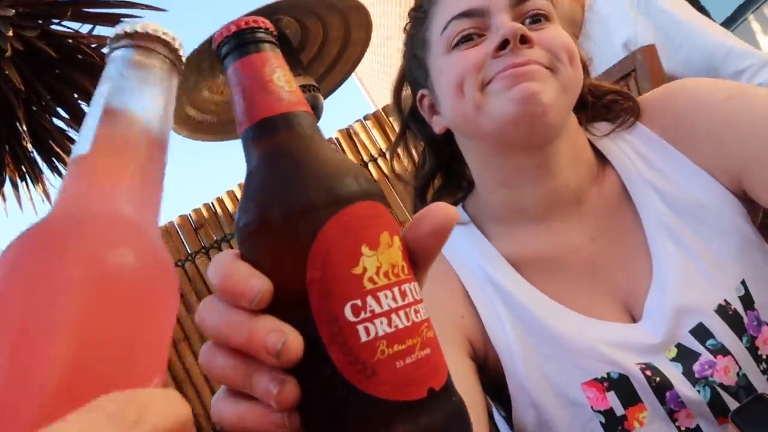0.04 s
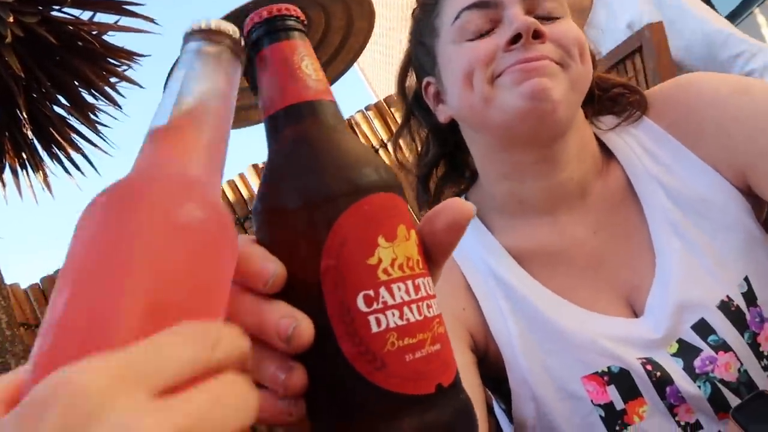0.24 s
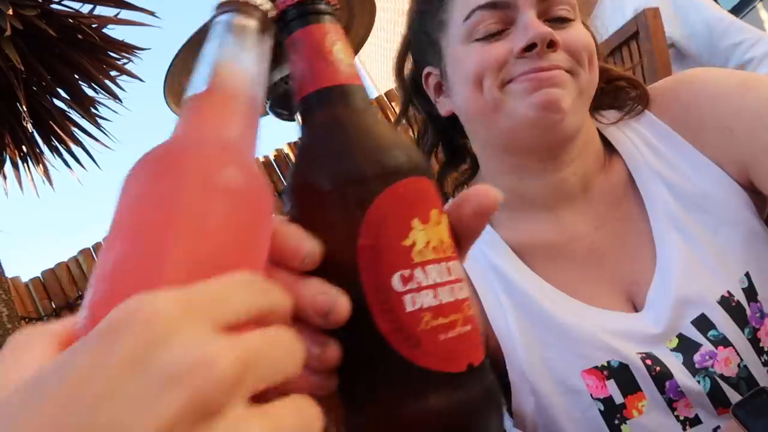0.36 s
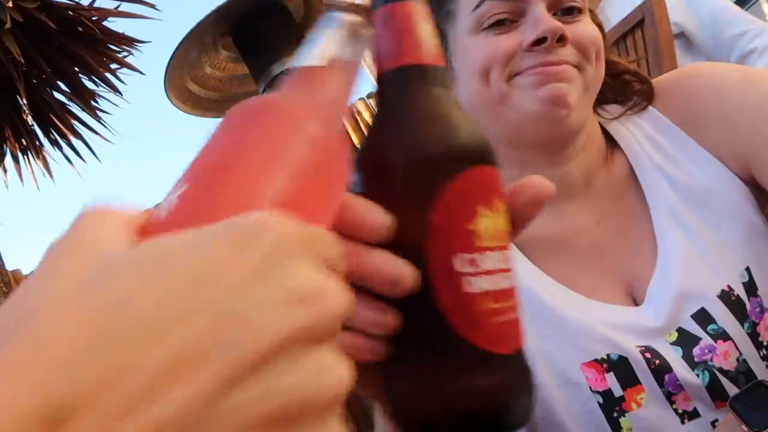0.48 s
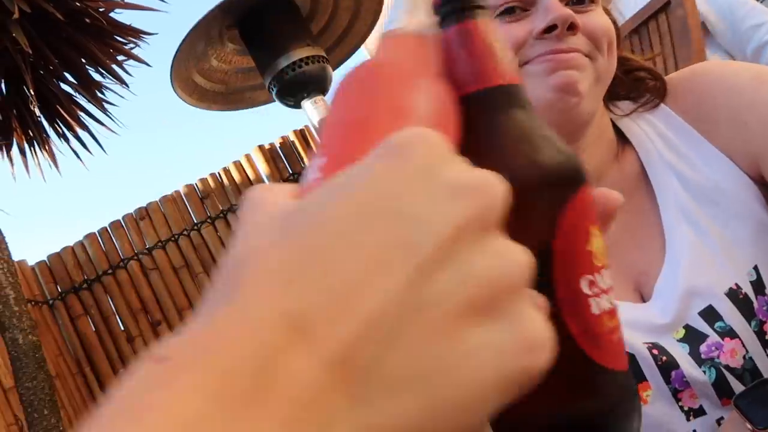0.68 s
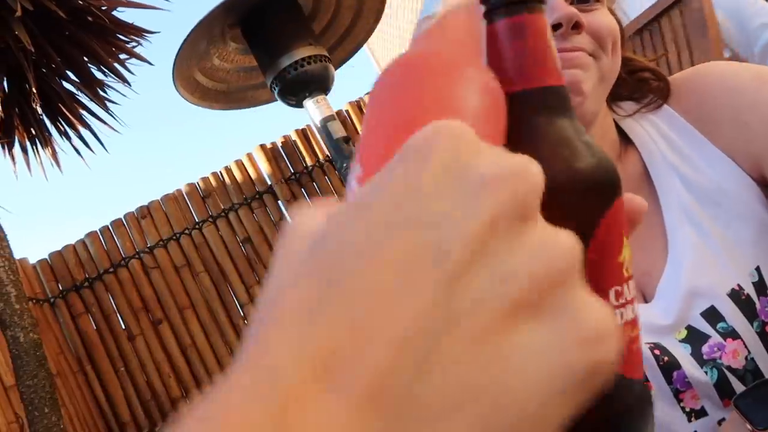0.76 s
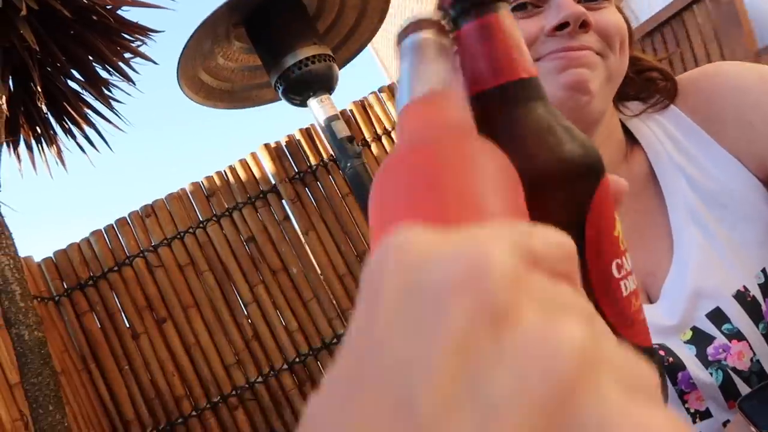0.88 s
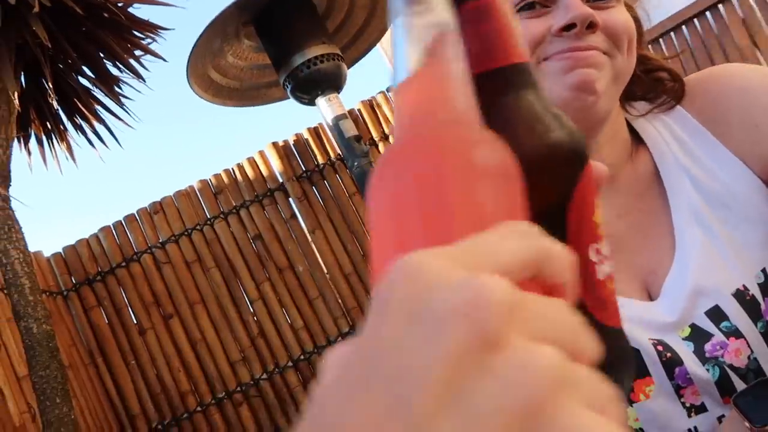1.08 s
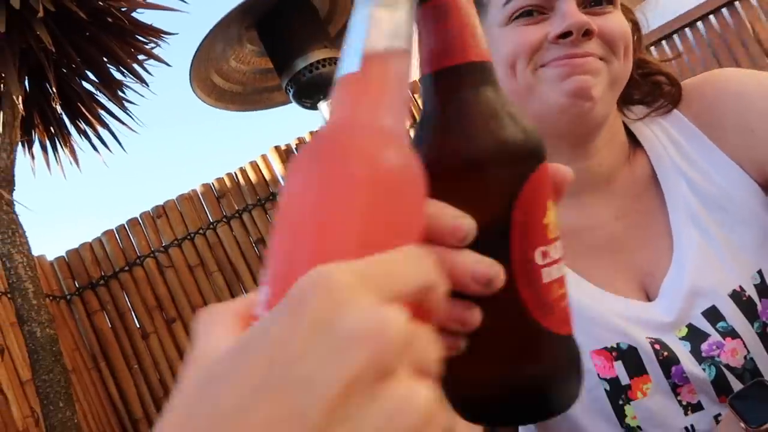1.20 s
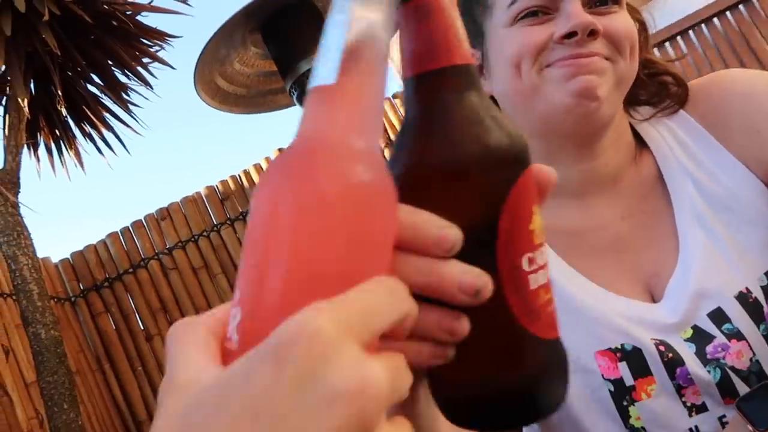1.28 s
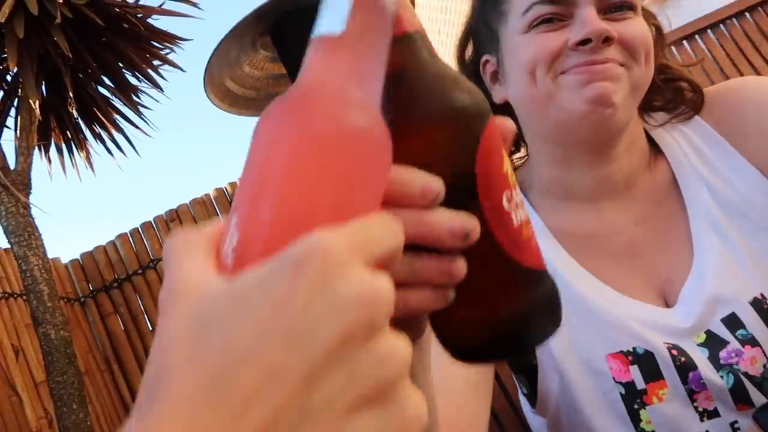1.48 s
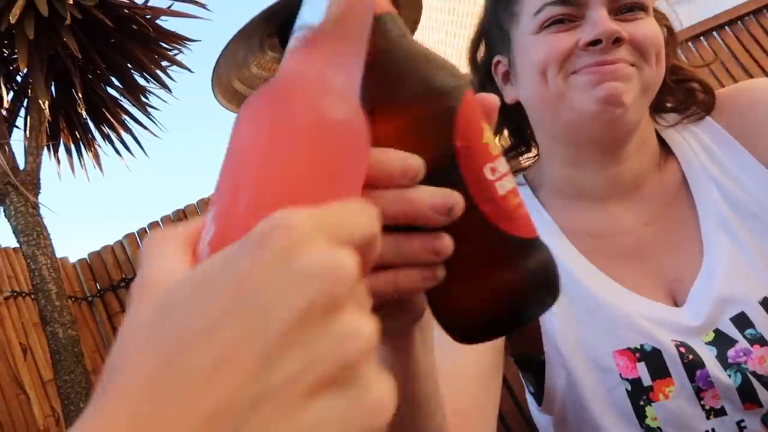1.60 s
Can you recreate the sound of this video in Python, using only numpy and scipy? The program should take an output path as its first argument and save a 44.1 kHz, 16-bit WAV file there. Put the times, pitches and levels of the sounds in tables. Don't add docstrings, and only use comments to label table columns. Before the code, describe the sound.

Two full glass bottles clink close to a small camera microphone outdoors. A faint ring dies away, then hard bright knocks hit at 0.22-0.32 s. A dense run from 0.49 s chatters and scrapes around 0.65-0.88 s, with sharp last clinks near 0.95 s. High, beating rings fade after 1 s; a faint rub at 1.4 s and light taps at 1.5-1.65 s follow over low rumble and hum.

```python
import sys
import numpy as np
from scipy import signal
from scipy.fft import rfft, irfft, next_fast_len
from scipy.io import wavfile

SR = 44100
rng = np.random.default_rng(int(sys.argv[2]) if len(sys.argv) > 2 else 0)


def put_to_file(sound):
    columns = np.atleast_2d(sound).T
    safe = np.clip(columns, -1, 1)
    whole_steps = np.round(safe * 32767)
    wavfile.write(sys.argv[1], SR, whole_steps.astype(np.int16))


def amplitude_ratio(level_db):
    exponent = np.asarray(level_db, float) / 20
    return 10 ** exponent


N = 72765
TIME_S = np.arange(N) / SR


def rms_one(x):
    return x / np.sqrt(np.mean(x ** 2) + 1e-20)


def at_hz(points, hz):
    table_hz, value = np.array(points).T
    return np.interp(np.log(hz), np.log(table_hz), value)


def over_time(points):
    return np.interp(TIME_S, *np.transpose(points))


def latest(start_s):
    return np.searchsorted(start_s, TIME_S, "right") - 1


def resonance(x, hz, width_hz):
    r = np.exp(-np.pi * width_hz / SR)
    b = (1 - r * r) / 2
    return signal.lfilter([b, 0, -b], [1, -2 * r * np.cos(2 * np.pi * hz / SR), r * r], x + 1e-18)


def double_resonance(x, hz, width_hz):
    return resonance(resonance(x, hz, width_hz), hz, width_hz)


def struck(start_s, level_db, hz, t60_s, share=0, split_hz=0):
    contact_s = 0.00028
    k = latest(start_s)
    age_s = TIME_S - start_s[k]
    share = (share * np.ones(len(start_s)))[k]
    decay = (k >= 0) * amplitude_ratio(level_db[k] + 2 - 60 * np.abs(age_s) / t60_s)
    swing = decay * (1 + share * np.exp(2j * np.pi * split_hz * age_s))
    r = np.exp(-1 / (contact_s * SR))
    swing = signal.lfilter([(1 - r) ** 2], [1, -2 * r, r * r], swing)
    return np.imag(swing * np.exp(2j * np.pi * np.cumsum(hz * np.ones(N)) / SR))


# (time [s], crack [dB], main ring [dB], second ring [dB])
SQUARE_KNOCKS = [
    (0.4898, -27, -38, -31.5),
    (0.5814, -11, -18, -22),
    (0.727, -4, -30.5, -29),
    (0.755, -11.5, -16.5, -38),
    (1.201, -33.5, -49, -57),
    (1.636, -17, -30, -40),
]
# (time [s], crack [dB], main ring [dB], second ring [dB])
PRESSED_KNOCKS = [(0.5408, -20.5, -23.5, -25.5), (0.5629, -5, -7.5, -28), (0.642, -16.5, -15.5, -30),
                  (0.6537, -18, -12.5, -28), (0.6619, -17.5, -24, -27), (0.6766, -23, -12, -41.5),
                  (0.7719, -12, -12.5, -30), (0.7824, -11.5, -11, -24.5), (1.0318, -45, -21.5, -38)]
# (time [s], crack [dB], main ring [dB], second ring [dB],
# partner share [ratio])
OWN_SHARE_KNOCKS = [(0.0, -76, -30, -48.5, -0.13), (0.2832, -9, -18, -21, -0.62),
                    (0.3161, -10, -16, -22, -0.37), (0.5135, -19, -20, -35.5, -.9),
                    (0.8154, -19.5, -14, -27.5, .25), (0.964, -57, -11, -32, .35),
                    (.990, -63, -9, -40, 0.56), (1.006, -65, -15, -42.5, -.15),
                    (0.5484, -13.5, -10, -21.5, -.4), (0.699, -33.5, -14, -29.5, -0.18),
                    (.706, -39, -20, -22.5, 0.002), (0.9137, -18, -13, -15, -0.26),
                    (1.1066, -49, -50, -57, -0.26), (.2240, -6, -6.5, -23, -0.41),
                    (0.2318, -40.5, -8.5, -41, 0.17), (.5728, -1.5, -6, -30, -0.84),
                    (0.9528, -7, -5.5, -28.5, 0.63), (1.212, -55, -61.5, -71, -0.39),
                    (0.974, -21.5, -5, -23.5, -0.1), (1.509, -36.5, -57, -50.5, -0.87),
                    (1.5199, -23, -37, -33, 0.54), (1.5413, -31.5, -41.5, -37, -1)]
# (time [s], pitch [Hz])
MAIN_SLOSH = [(0.222, 3278), (0.301, 3231), (0.362, 3269), (.52, 3322), (.65, 3202), (0.701, 3226),
              (.79, 3267), (0.888, 3266), (0.921, 3226), (0.991, 3262)]
# (time [s], pitch [Hz])
SECOND_RING_SLOSH = [(0.232, 4386), (0.381, 4346), (.49, 4410), (0.569, 4333), (.72, 4338), (0.852, 4387),
                     (.91, 4332), (1.089, 4337)]
# (time [s], level [dB])
NECK_KNOCKS = [
    (.590, -26),
    (.956, -31),
]


def walls():
    square_share, pressed_share = 0.27, 0.011
    rows = [(*r, square_share) for r in SQUARE_KNOCKS]
    rows += [(*r, pressed_share) for r in PRESSED_KNOCKS]
    rows += list(OWN_SHARE_KNOCKS)
    start_s, _, main_db, second_db, share = np.transpose(sorted(rows))
    main = struck(start_s, main_db, over_time(MAIN_SLOSH), t60_s=0.21, share=share, split_hz=35)
    second = struck(start_s, second_db, over_time(SECOND_RING_SLOSH), t60_s=0.13, share=0.29, split_hz=33)
    neck = struck(*np.transpose(NECK_KNOCKS), hz=3660, t60_s=0.13)
    return main + second + neck


# (time [s], crack [dB])
BOUNCES = [(0.5044, -28), (0.5894, -16.5), (0.7474, -9), (0.7664, -9), (0.7964, -13), (0.8034, -14),
           (0.9834, -21.5), (0.9914, -28.5), (1.4845, -36), (1.5264, -32), (.4965, -32), (.5095, -27),
           (.5738, -5.5), (.8095, -18), (.7605, -18), (1.6454, -23.5)]
# (centre [Hz], width [Hz], level [dB])
CONTACT_COLOUR = [(2000, 1360, 4), (1166, 280, -8)]
# (centre [Hz], width [Hz], level [dB])
GLINT_MODES = [(4656, 2000, -19.5), (6200, 1000, -17.5), (10040, 1400, -24.5), (12600, 970, -23.5)]


def buzz():
    k = np.arange(7)
    start_s, gap_s, shrink = 0.670, 0.0075, 0.955
    return list(zip(start_s + np.cumsum(gap_s * shrink ** k) - gap_s, -16 - 1.5 * k))


def cracks():
    highs_per_crack_db = 0.5
    knocks = list(SQUARE_KNOCKS) + list(PRESSED_KNOCKS) + list(OWN_SHARE_KNOCKS) + list(BOUNCES) + buzz()
    rows = np.array([r[:2] for r in knocks])
    clicks = np.zeros(N)
    clicks[(rows[:, 0] * SR).astype(int)] = amplitude_ratio(rows[:, 1] + 17)
    contact = clicks
    for level_db, t60_s in ((-23, 0.009), (-30.5, 0.061)):
        tail = signal.lfilter([1], [1, -amplitude_ratio(-60 / (t60_s * SR))], clicks + 1e-18)
        contact = contact + amplitude_ratio(level_db) * tail * rng.standard_normal(N)
    body = sum(amplitude_ratio(db) * (-1) ** k * resonance(contact, hz, width_hz)
               for k, (hz, width_hz, db) in enumerate(CONTACT_COLOUR))
    start_s, crack_db = rows[np.argsort(rows[:, 0])].T
    latest_db = crack_db[np.searchsorted(start_s, np.arange(1, N + 1) / SR) - 1]
    bright = contact * amplitude_ratio(highs_per_crack_db * (latest_db + 4))
    top = sum(amplitude_ratio(db) * double_resonance(bright, hz, width_hz) for hz, width_hz, db in GLINT_MODES)
    return signal.lfilter(*signal.butter(2, 4800, fs=SR), body) + top


# (time [s], low [dB], middle [dB], high [dB], top modes [dB])
SHOULDER_KNOCKS = [(0.2257, -36.5, -29, -50, -50), (0.2824, -23.5, -45.5, -38.5, -34.5),
                   (0.3164, -25.5, -54, -39.5, -41.5), (.490, -35.5, -46, -51.5, -60),
                   (0.5713, -19.5, -39.5, -50, -37.5), (0.6428, -30, -38, -46.5, -45),
                   (0.6767, -42, -47.5, -46.5, -45), (0.728, -14, -18.5, -48.5, -40),
                   (0.7476, -13, -23.5, -37, -44), (0.755, -11.5, -25.5, -31, -29.5),
                   (0.7726, -15.5, -30.5, -30.5, -29.5), (0.7829, -25.5, -33.5, -32, -32),
                   (0.7966, -21, -22.5, -29, -33), (0.817, -17.5, -37.5, -37.5, -40),
                   (0.913, -36.5, -35.5, -46.5, -38.5), (0.953, -42, -29, -47.5, -36.5),
                   (1.0324, -46.5, -54, -64, -69), (1.52, -51, -54.5, -58, -67)]
# (pitch [Hz], level [dB], t60 [s])
LOW_MODES = [(1850, -6, .09), (2360, -9, .05)]
MIDDLE_MODES = [(3705, 2, 0.12), (4590, -7.5, 0.077), (4710, -10.5, 0.15)]
HIGH_MODES = [(5830, -9, 0.066), (6520, -7.5, 0.058), (6810, -3.5, 0.088), (7010, -3.5, 0.14),
              (7650, -21, 0.035)]
TOP_MODES = [(8950, -20.5, 0.05), (9890, -11.5, .03), (10200, -12.5, .04), (11900, -11.5, 0.038),
             (12250, -13.5, 0.03), (12700, -8, .03), (13500, -15, .04), (15450, -25.5, .03)]
# (time [s], pitch [Hz], level [dB], t60 [s])
SINGLE_KNOCK_MODES = [(0.2844, 5020, -30, .11), (0.2818, 5819, -38, .2), (.3162, 5060, -46, .08),
                      (0.5709, 5830, -38, 0.088), (.524, 4354, -25, 0.097), (.2835, 8840, -41, .07),
                      (.3162, 8950, -48, .06), (0.726, 2323, -17.5, .07), (0.728, 5830, -32.5, .08),
                      (.772, 4720, -30, .1), (0.8159, 4730, -29, 0.18), (0.8155, 2513, -31, .07),
                      (0.953, 9610, -25.5, .022), (.952, 10900, -35, .03), (.952, 15370, -44, .04),
                      (.952, 8200, -43, 0.035), (0.95, 5886, -33, 0.07), (1.031, 6900, -54, .08),
                      (1.455, 4350, -54, .08), (1.485, 4290, -51.5, .08)]


def shoulders():
    scatter_db, pitch_scatter = 4.5, 0.006
    partner_share, partner_split = 0.15, 0.018
    start_s, *levels_db = np.transpose(SHOULDER_KNOCKS)
    count, k = len(start_s), latest(start_s)
    out = np.zeros(N)
    for group_db, modes in zip(levels_db, (LOW_MODES, MIDDLE_MODES, HIGH_MODES, TOP_MODES)):
        for hz, mode_db, t60_s in modes:
            knock_db = group_db + mode_db + scatter_db * rng.standard_normal(count)
            knock_hz = hz * (1 + pitch_scatter * (hz > 4000) * rng.standard_normal(count))
            share = partner_share * rng.random(count)
            split_hz = hz * partner_split * (1 + rng.random())
            out += struck(start_s, knock_db, knock_hz[k], t60_s, share, split_hz)
    for lone_s, hz, lone_db, t60_s in SINGLE_KNOCK_MODES:
        out += struck(np.array([lone_s]), np.array([lone_db]), hz, t60_s)
    return out


# (time [s], gliding mode [dB], steady mode [dB], steady pitch [Hz], thump [dB])
BELLY_KNOCKS = [(0.2254, -29, -37.5, 1380, -17), (0.2828, -16, -23.5, 1381, -18.5),
                (.541, -55.5, -33, 1411, -23.5), (0.7281, -33.5, -58, 1410, -50.5),
                (0.771, -28, -57, 1410, -49), (0.818, -33, -64, 1369, -61),
                (0.9153, -30.5, -27, 1420, -43.5), (0.9518, -40, -45, 1430, -42.5),
                (1.5196, -69, -73, 1420, -43), (1.5405, -78, -80, 1420, -43.5),
                (1.636, -54, -57, 1420, -37)]
# (time [s], pitch [Hz])
BELLY_GLIDE = [(.225, 1452), (.28, 1560), (.315, 1550), (.365, 1419), (.73, 1545), (.78, 1425), (.81, 1430),
               (.86, 1560), (.905, 1503), (.915, 1707), (.955, 1544), (1.08, 1439)]


def belly():
    thump_hz, thump_width_hz, thump_gain_db = 815, 930, 34
    start_s, glide_db, steady_db, steady_hz, thump_db = np.transpose(BELLY_KNOCKS)
    clicks = np.zeros(N)
    clicks[((start_s + 0.00028) * SR).astype(int)] = amplitude_ratio(thump_db + thump_gain_db)
    clicks[int(0.3158 * SR)] = amplitude_ratio(-21 + thump_gain_db)
    thump = resonance(resonance(clicks, thump_hz, thump_width_hz), thump_hz, 2 * thump_width_hz)
    glide = struck(start_s, glide_db, over_time(BELLY_GLIDE), t60_s=0.31)
    steady = struck(start_s, steady_db, steady_hz[latest(start_s)], t60_s=0.35)
    return glide + steady + thump


# (start [s], end [s], level [dB])
DRAGS = [
    (.645, 0.88, -31),
    (.756, .85, -23.5),
    (.953, 0.98, -25),
    (0.2, .34, -31),
]
# (centre [Hz], width [Hz], level [dB])
DRAG_COLOUR = [(4800, 500, 4), (6580, 120, 4), (6670, 100, 6), (6930, 120, 6), (10000, 400, -5.5),
               (12100, 250, -5), (12660, 300, -2.5), (13540, 300, -4.5)]


def scrape():
    slips_per_s, release_s = 4200, 0.03
    drag = sum(amplitude_ratio(db) * (TIME_S > start_s) * np.clip((end_s - TIME_S) / release_s, 0, 1)
               for start_s, end_s, db in DRAGS)
    slips = drag * (rng.random(N) < slips_per_s / SR) * rng.standard_normal(N)
    return sum(amplitude_ratio(db) * double_resonance(slips, hz, width_hz) for hz, width_hz, db in DRAG_COLOUR)


def rub():
    centre_s, width_s, hz, level_db = 1.41, 0.025, 3500, -64
    hiss = rms_one(double_resonance(rng.standard_normal(N), hz, hz))
    return amplitude_ratio(level_db) * hiss * np.exp(-0.5 * ((TIME_S - centre_s) / width_s) ** 2)


# (frequency [Hz], lead [rad])
LEFT_LEAD = [(3000, 0.16), (3500, 0.14), (4300, 1.11), (7000, -2), (8500, -2.5), (10000, -2), (14000, -1.6)]


def ports(x):
    scatter_db, scatter_t60_s, scatter_hz = -10.5, 0.011, 5000
    size = next_fast_len(N + 2000)
    lead_rad = at_hz(LEFT_LEAD, np.arange(1, size // 2 + 2) * SR / size)
    tail = rng.standard_normal(1500) * amplitude_ratio(-60 * np.arange(1500) / SR / scatter_t60_s)
    highs = signal.lfilter(*signal.butter(4, scatter_hz, "high", fs=SR), x)
    scatter = amplitude_ratio(scatter_db) * signal.fftconvolve(highs, tail / np.linalg.norm(tail))[:N]
    spectrum = rfft(x, size)
    return np.array([irfft(spectrum * np.exp(0.5j * sign * lead_rad), size)[:N] + sign * scatter
                     for sign in (1, -1)])


def banded_noise(spectrum):
    flicker_db = 4
    out, edges_hz = 0, 25 * 2 ** np.arange(0, 9.6, 0.5)
    white = rng.standard_normal((2, N + 8000))
    for k, (low, high) in enumerate(zip(edges_hz, edges_hz[1:])):
        sos = signal.butter(2, [low, high], "band", fs=SR, output="sos")
        band = signal.sosfilt(sos, white[k % 2])[8000:]
        flicker = np.interp(np.arange(N), np.linspace(0, N, 20), rng.standard_normal(20))
        out = out + amplitude_ratio(at_hz(spectrum, np.sqrt(low * high)) + flicker_db * flicker) * band
    return rms_one(out)


# (time [s], level [dB])
CAMERA_GAIN = [
    (0, -38.5),
    (0.501, -40.5),
    (.62, -45),
    (0.931, -48.5),
    (0.999, -59.5),
    (1.35, -55),
    (1.65, -53),
]
# (frequency [Hz], level [dB per Hz])
AIR_MID = [(30, -29.5), (60, -7), (150, 2.5), (420, -9.5), (700, -7), (3300, -21), (6000, -39), (8000, -73),
           (12000, -110)]
# (frequency [Hz], level [dB per Hz])
AIR_OPPOSED = [(200, -41), (300, -2.5), (3300, -5.5), (7000, -14), (13000, -22.5)]
# (pitch [Hz], level [dB re background])
HUM_PARTIALS = [(62, -12), (124, -1.5), (187, -11), (373, -9.5)]


def patio():
    hum_follows = 0.7
    gain_db = over_time(CAMERA_GAIN)
    mean_db = gain_db.mean()
    hum_gain_db = mean_db + hum_follows * (gain_db - mean_db)
    hum = sum(amplitude_ratio(db) * rms_one(resonance(rng.standard_normal(N + SR), hz, width_hz=5)[SR:])
              for hz, db in HUM_PARTIALS)
    lowpass = signal.butter(4, 6800, fs=SR, output="sos")
    mid = signal.sosfilt(lowpass, amplitude_ratio(3) * banded_noise(AIR_MID))
    side = amplitude_ratio(-15.5) * banded_noise(AIR_OPPOSED)
    return amplitude_ratio(gain_db) * (mid + side * [[1], [-1]]) + amplitude_ratio(hum_gain_db) * hum


def scene():
    delay_s = 0.00103
    glass = walls() + cracks() + shoulders() + belly() + scrape()
    glass = np.interp(np.arange(N) - delay_s * SR, np.arange(N), glass)
    return ports(glass + rub()) + patio()


def roll_off(x):
    return signal.sosfilt(signal.butter(12, 15940, fs=SR, output="sos"), x)


def record(dry):
    clip_top, stop_hz = 0.97, 16500
    lowpass = signal.cheby2(10, 50, stop_hz, fs=SR, output="sos")
    mix = signal.sosfilt(lowpass, np.clip(dry, -clip_top, clip_top))
    return roll_off(mix)


dry = scene()
out = record(dry)
put_to_file(out)
```